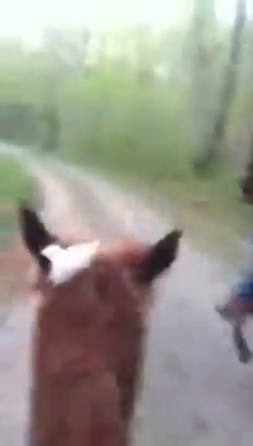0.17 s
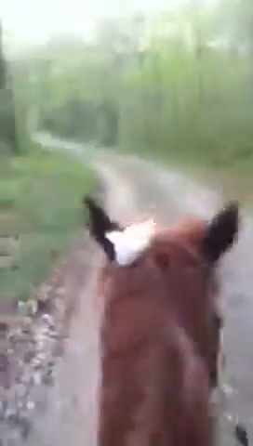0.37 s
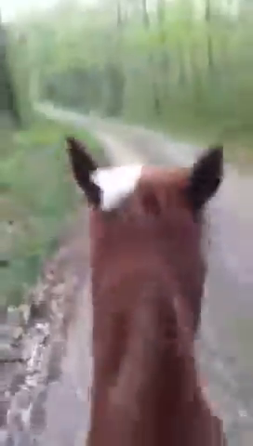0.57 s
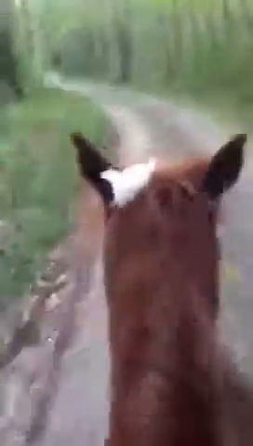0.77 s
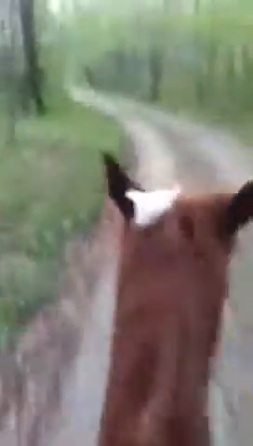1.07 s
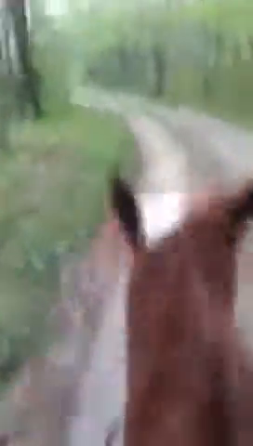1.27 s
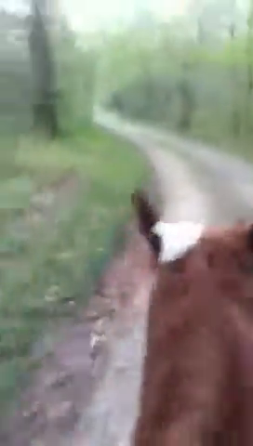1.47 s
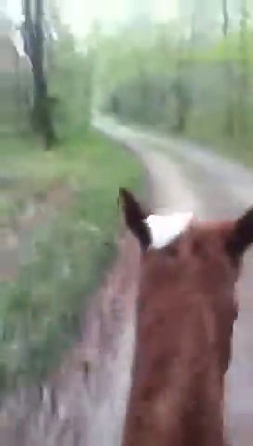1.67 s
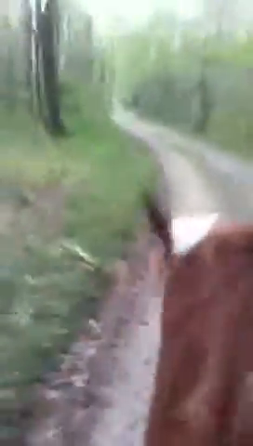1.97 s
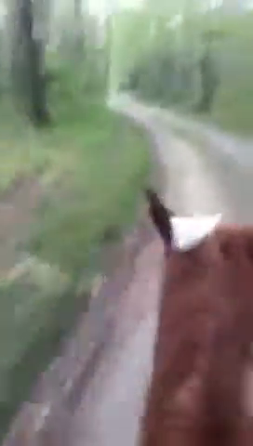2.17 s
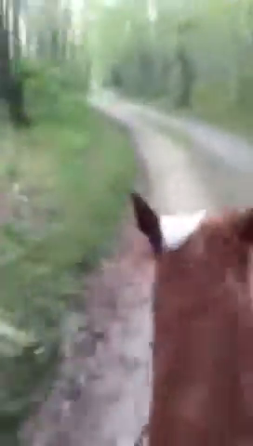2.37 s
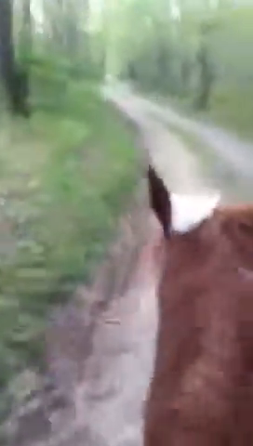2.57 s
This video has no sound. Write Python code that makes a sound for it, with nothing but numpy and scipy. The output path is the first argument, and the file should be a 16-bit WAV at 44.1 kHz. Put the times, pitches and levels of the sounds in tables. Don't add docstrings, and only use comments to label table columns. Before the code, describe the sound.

Horse hooves trot fast over loose gravel, grinding and snapping stones with hollow clops, while low wind thumps and pops on a close microphone carried in the saddle; faint bridle chinks and distant scuffing outdoors.

```python
import sys
import numpy as np
from scipy import signal
from scipy.io import wavfile
from scipy.ndimage import uniform_filter1d, minimum_filter1d

SR = 44100
rng = np.random.default_rng(int(sys.argv[2]) if len(sys.argv) > 2 else 0)


def transcribe(signal):
    frames = np.atleast_2d(signal).T
    limited = np.clip(frames, -1, 1)
    pcm = np.round(limited * 32767).astype(np.int16)
    wavfile.write(sys.argv[1], SR, pcm)


def elevation(decibels):
    levels = np.asarray(decibels, float)
    return 10 ** (levels / 20)


N = 119952


def evened(x):
    return x / np.sqrt(np.mean(x ** 2) + 1e-20)


def colour(x, points):
    freq_hz, level_db = np.transpose(points)
    bins_hz = np.abs(np.fft.fftfreq(8192, 1 / SR))
    db = np.interp(np.log(bins_hz + 1), np.log(freq_hz), np.maximum(level_db, -100))
    log_gain = db * np.log(10) / 20
    taps = np.fft.ifft(np.exp(np.conj(signal.hilbert(log_gain)))).real[:4096]
    return signal.fftconvolve(x, taps)[:N]


def add(mix, start_s, sound):
    part = mix[max(round(start_s * SR), 0):][:len(sound)]
    part += sound[:len(part)]


def resonate(x, hz, width_hz):
    turn = np.exp(2j * np.pi * np.cumsum(hz * np.ones(len(x))) / SR)
    pole = np.exp(-np.pi * width_hz / SR)
    return 2 * (turn * signal.lfilter([1 - pole], [1, -pole], x / turn)).real


def clicks(per_s, spread_db):
    size = elevation(spread_db * np.minimum(rng.exponential(1, N), 4)) * rng.choice([-1., 1.], N)
    return evened(size * (rng.random(N) < per_s / SR))


def swell(t, peak_s):
    return t / peak_s * np.exp(1 - t / peak_s)


# freq_hz, level_db
BED_COLOUR = [(24, -23), (40, -0.5), (114, -9), (973, -16.5), (1680, -29.5), (8310, -31), (15500, -38.5)]


def bed():
    bed_db, whine_hz, whine_db = -44.5, 14994, -70
    flutter = elevation(2.5 * evened(uniform_filter1d(rng.standard_normal(N), 700)))
    z = signal.stft(colour(rng.standard_normal(N), BED_COLOUR), nperseg=512)[2]
    patches = uniform_filter1d(rng.standard_normal(z.shape), 14, axis=0)
    patches = evened(uniform_filter1d(patches, 4, axis=1))
    hiss = evened(signal.istft(z * elevation(3 * patches), nperseg=512)[1][:N])
    whine = np.sin(2 * np.pi * whine_hz * np.arange(N) / SR)
    return elevation(bed_db) * flutter * hiss + elevation(whine_db) * whine


# centre_s, width_s, level_db
GUSTS = [(0.132, 0.028, -15.5), (0.168, 0.013, -17.5), (0.325, 0.034, -17.5), (0.386, 0.042, -17),
         (0.498, 0.046, -16), (0.54, 0.017, -20), (.573, 0.022, -21.5), (0.628, 0.018, -15.5),
         (0.655, 0.03, -20), (.715, 0.04, -22), (.756, 0.01, -17.5), (.782, 0.037, -16.5),
         (0.903, 0.032, -17), (0.938, 0.0086, -18), (0.976, 0.083, -22), (1.026, 0.032, -21.5),
         (1.167, 0.031, -18.5), (1.246, 0.014, -13), (1.289, 0.03, -25.5), (1.317, 0.029, -9.5),
         (1.393, 0.011, -20), (1.421, 0.017, -14), (1.587, 0.031, -21), (1.625, 0.035, -18),
              (1.662, 0.008, -17), (1.759, 0.041, -27.5), (1.8, 0.016, -18.5), (1.839, 0.022, -11.5),
              (1.88, 0.019, -18), (1.905, 0.02, -12), (1.954, 0.011, -17.5), (2.003, 0.019, -23.5),
              (2.107, 0.029, -23), (2.163, 0.022, -20), (2.219, 0.015, -17), (2.265, 0.023, -21.5),
              (2.449, 0.035, -19.5), (2.489, 0.025, -19.5), (2.71, 0.023, -15.5)]
# start_s, level_db
EDDY_POPS = [(0.1673, -35), (0.316, -6.5), (0.5, -6), (.574, -19), (0.6562, -7), (0.9432, -4), (0.9651, 0),
             (1.3086, -17), (1.317, -9), (1.418, -11), (1.6633, -9.5), (1.8382, -3.5), (2.225, 1),
             (2.6105, -15.5), (2.707, -7.5)]
# freq_hz, level_db
WIND_COLOUR = [(20, -35.5), (75, -1.5), (125, 2), (330, -9), (900, -29.5), (2000, -74)]


def wind():
    lumps_per_s, spread_db, wind_db, pop_s = 900, 2.5, 0, 0.0007
    t, power = np.arange(N) / SR, np.zeros(N)
    for centre_s, width_s, level_db in GUSTS:
        power += elevation(2 * level_db) * np.exp(-np.abs(2.67 * (t - centre_s) / width_s) ** 1.695)
    lumps = evened(colour(clicks(lumps_per_s, spread_db), WIND_COLOUR))
    lumps /= np.sqrt(uniform_filter1d(lumps ** 2, 900) + 0.084)
    low = uniform_filter1d(uniform_filter1d(lumps, 70), 70)
    lumps = low + (lumps - low) * np.minimum(power / elevation(-43.0), 1) ** 0.1
    out = elevation(wind_db) * np.sqrt(power) * lumps

    u = np.arange(-300, 300) / SR / pop_s
    pop = np.exp(-np.abs(1.66 * u) ** 1.39)
    pop -= .5 * np.exp(-(u - 1.7) ** 2) + 0.031 * np.exp(-(u + 3.5) ** 2)
    for (start_s, level_db), sign in zip(EDDY_POPS, rng.choice([-1., 1.], len(EDDY_POPS))):
        add(out, start_s - 300 / SR, sign * elevation(level_db) * pop)
    return out


# start_s, level_db, pitch_hz
TACK_CHINKS = [(.545, -52, 10870), (.566, -47, 11250), (.568, -53, 12580), (.69, -51, 10870),
               (.93, -56, 10870), (1.19, -55, 10870), (1.572, -50, 13650), (1.6, -51, 13580),
               (1.605, -49, 10870), (1.61, -51, 12580), (2.51, -55, 10870), (2.64, -53, 10870)]


def tack():
    peak_s, width_hz = .009, 70
    out, t = np.zeros(N), np.arange(6000) / SR
    for start_s, level_db, pitch_hz in TACK_CHINKS:
        waver = evened(resonate(rng.standard_normal(6000), pitch_hz, width_hz))
        ring = np.sin(2 * np.pi * pitch_hz * t) + .5 * waver
        add(out, start_s, elevation(level_db) * swell(t, peak_s) * ring)
    return out


# start_s, level_db, pitch_hz
STONE_CRACKS = [(0.1195, -32, 3730), (0.231, -24, 4180), (0.2567, -13, 5130), (0.2745, -22.5, 6030),
                (0.3149, -22, 1340), (0.34, -14, 6400), (0.3555, -17, 8640), (0.4255, -17.5, 2330),
                (0.4399, -12, 2250), (0.479, -26, 2150), (0.4813, -24, 2920), (0.6041, -13, 2180),
                (0.611, -15, 4660), (0.614, -16, 4860), (0.6283, -12.5, 1390), (0.7315, -7.5, 7340),
                (0.7478, -16, 4450), (0.7588, -11.5, 3930), (0.7652, -25, 2540), (0.7822, -15, 1240),
                (0.7969, -21.5, 2310), (0.8237, -34, 2500), (0.8774, -11, 7660), (0.8942, -16, 1710),
                (0.967, -15.5, 8600), (1.1429, -19, 2980), (1.1735, -16, 2850), (1.1885, -24, 1420),
                (1.229, -25, 4730), (1.4186, -10, 1740), (1.443, -23, 2520), (1.4836, -11.5, 2520),
                (1.4866, -8, 3480), (1.55, -21, 5580), (1.637, -23, 1580), (1.6989, -6.5, 2380),
                (1.7144, -25, 2930), (1.8113, -21.5, 4200), (1.8381, -23, 1090), (1.8915, -10, 1380),
                (1.9432, -17.5, 3380), (1.9589, -14.5, 2290), (2.1502, -17.5, 1360), (2.193, -22.5, 7660),
                (2.2055, -10.5, 2780), (2.2071, -10.5, 3500), (2.2171, -14, 2840), (2.2476, -25, 4030),
                (2.328, -15, 6110), (2.3713, -22, 9190), (2.4347, -16.5, 3420), (2.4523, -10, 4770),
                (2.463, -20, 1710), (2.5447, -12, 4330), (2.6068, -13, 2300), (2.7012, -24, 1230)]


def cracks():
    ring_cycles, roughness = 1.18, 0.58
    out, t = np.zeros(N), np.arange(400) / SR
    for start_s, level_db, pitch_hz in STONE_CRACKS:
        ring = np.exp(-t * pitch_hz / ring_cycles) * np.sin(2 * np.pi * pitch_hz * t)
        splinters = rng.standard_normal(60) * np.exp(-np.arange(60) / 25)
        rough = np.convolve(ring, splinters)[:400] * np.sqrt(pitch_hz / SR)
        add(out, start_s, -elevation(level_db) * (ring + roughness * rough))
    return out


# start_s, level_db
STONE_SNAPS = [(0.1175, -22.5), (0.2296, -17), (0.2567, -20.5), (0.594, -41), (0.4650, -23), (0.7304, -22),
               (0.8242, -29), (0.858, -28), (0.964, -35), (1.1697, -14.5), (1.4095, -18.5), (1.5030, -29),
               (1.5491, -18.5), (1.9443, -25), (2.2155, -18.5), (2.2475, -17), (2.327, -25),
               (2.5427, -21.5), (2.607, -26), (0.809, -34), (0.8367, -28), (0.848, -29), (0.932, -28.5),
               (2.41, -25.5), (2.537, -33), (2.058, -33), (1.034, -24)]
# pitch_hz, level_db, t60_s
HOOF_KNOCK = [
    (1035, 4.5, 0.0079),
    (2470, -5.5, 0.013),
    (377, 6, 0.0088),
]
# freq_hz, level_db
STONE_COLOUR = [(300, 6), (1500, -4.5), (2600, -2), (5500, -8), (9000, -10), (15000, -17)]


def snaps():
    snap_t60_s = 0.011
    burst, hit, t = np.zeros(N), np.zeros(N), np.arange(700) / SR
    for start_s, level_db in STONE_SNAPS:
        noise = elevation(level_db - 60 * t / snap_t60_s) * rng.standard_normal(700)
        add(burst, start_s, elevation(5.5) * noise)
        add(hit, start_s, elevation(-19) * noise)
    knock = np.zeros(700)
    for pitch_hz, level_db, t60_s in HOOF_KNOCK:
        knock += elevation(level_db - 60 * t / t60_s) * np.sin(2 * np.pi * pitch_hz * t)
    highpass = signal.butter(2, 300, 'high', fs=SR, output='sos')
    knocks = signal.sosfilt(highpass, signal.oaconvolve(hit, knock)[:N])
    return colour(uniform_filter1d(burst, size=3), STONE_COLOUR) + knocks


# start_s, level_db, pitch_hz
SHOE_CLOPS = [
    (0.783, -18, 1140),
    (0.89, -9, 903),
    (1.8873, -6, 1180),
    (2.149, -12, 1116),
    (2.45, -12.5, 1070),
    (1.572, -25.5, 1950),
    (1.7, -28, 2040),
    (1.169, -24.5, 4900),
    (2.332, -19.5, 1117),
    (0.437, -22, 1200),
]


def clops():
    peak_s = .0021
    out, t = np.zeros(N), np.arange(1000) / SR
    for start_s, level_db, pitch_hz in SHOE_CLOPS:
        add(out, start_s, elevation(level_db) * swell(t, peak_s) * np.sin(2 * np.pi * pitch_hz * t))
    return out


def ground_stones(grind):
    stones, t = np.zeros(N), np.arange(300) / SR
    size = rng.integers(0, 24, N)
    clumps = elevation(4.5 * evened(uniform_filter1d(rng.standard_normal((8, N)), 300)))
    for k, hz in enumerate(np.linspace(28, 112, 24) ** 2):
        ring = np.sin(2 * np.pi * hz * t) * np.exp(-t * hz / 2.3) * np.sqrt(hz)
        stones += signal.oaconvolve(grind * clumps[k // 3] * (size == k), ring)[:N]
    stones = evened(colour(stones, STONE_COLOUR))
    return stones / np.sqrt(uniform_filter1d(stones ** 2, 700) + .5)


# start_s, crunch_db, clop_db (re crunch), length_s
HOOF_FALLS = [(0.167, -23.5, -4.5, 0.018), (0.194, -27.5, -9, 0.045), (0.233, -25, -2, 0.019),
              (0.3348, -16, -3.5, 0.025), (0.4237, -17, -0.5, 0.024), (0.4621, -10.5, -5.5, 0.038),
              (0.6016, -8, -13, 0.025), (0.684, -28.5, -7, 0.041), (0.743, -20.5, -4, 0.051),
              (0.772, -25, 6.5, 0.034), (0.8714, -16, -26, 0.037), (0.8912, -20.5, 9, 0.014),
              (0.911, -26, 1, 0.035), (1.021, -19.5, -4, 0.039), (1.124, -21.5, -1, 0.072),
              (1.1598, -10.5, -14, 0.026), (1.185, -28, 13, 0.029), (1.226, -25.5, -12, 0.022),
              (1.273, -17.5, -12.5, 0.014), (1.3387, -21.5, 3, 0.017), (1.413, -21.5, -2, 0.024),
              (1.433, -17.5, -1.5, 0.021), (1.4783, -16, -2, 0.027),
              (1.543, -20.5, -14, 0.03), (1.564, -30, 4, 0.057), (1.591, -23.5, 0.5, 0.015),
                   (1.6157, -21, 2.5, 0.034), (1.6873, -16.5, -5.5, 0.038), (1.7223, -28.5, 13.5, 0.03),
                   (1.7502, -20, 2, 0.022), (1.7994, -19, -3.5, 0.021), (1.8779, -12.5, -1, 0.028),
                   (1.9505, -16.5, -7, 0.032), (1.9985, -23.5, 0.5, 0.039), (2.0775, -16, -4, 0.014),
                   (2.1383, -18, 2, 0.04), (2.1933, -12.5, -9, 0.038), (2.244, -23.5, 7, 0.067),
                   (2.3271, -14.5, -1, 0.021), (2.382, -32.5, 4.5, 0.046), (2.4237, -16.5, -6.5, 0.044),
                   (2.4529, -17.5, -1, 0.025), (2.5333, -19, -1, 0.044), (2.601, -25.5, 10, 0.017),
                   (2.6455, -26.5, 0, 0.036), (2.691, -19, 6, 0.039)]


def hooves():
    grains_per_s, spread_db, loose_db = 8000, 3.5, -47.5
    crunch_gain_db, clop_gain_db, clop_hz, clop_width_hz = -10, -2.5, 1020, 250
    rise, fall_db, tail_db, tail_s = 0.2, -9.5, -17, 0.054
    grind, out = clicks(grains_per_s, spread_db), np.zeros(N)
    stones = ground_stones(grind)
    for start_s, crunch_db, clop_db, length_s in HOOF_FALLS:
        hz = clop_hz * rng.uniform(0.83, 1.07)
        u = np.arange(0, length_s + 3 * tail_s, 1 / SR) / length_s
        press = np.minimum(u / rise, 1) * elevation(fall_db * u) * np.clip(4 * (1 - u), 0, 1)
        tail = np.minimum(u, 1) * elevation(tail_db - 20 * u * length_s / tail_s)
        i = round(start_s * SR)
        n = len(grind[i:i + len(u)])
        clop = resonate(grind[i:i + n] * press[:n], hz, clop_width_hz)
        clop = resonate(clop, hz, 3 * clop_width_hz)
        clop /= np.abs(clop).max()
        crunch = (press + tail)[:n] * stones[i:i + n]
        step = elevation(crunch_gain_db) * crunch + elevation(clop_db + clop_gain_db) * clop
        add(out, start_s, elevation(crunch_db) * step)
    return out + elevation(loose_db) * stones


def scene():
    return (bed() + wind() + tack() + cracks() + snaps() + clops() + hooves())[None]


def masked(x):
    mask_db, spread_db = -44.5, 3
    z = signal.stft(x, nperseg=256)[2]
    band_power = (abs(z[1:]) ** 2).reshape(32, 4, -1).mean(1)
    band_db = 10 * np.log10(np.repeat(band_power, 4, axis=0) + 1e-20)
    treble_db = 10 * np.log10((abs(z[8:]) ** 2).sum(0) + 1e-20)
    near_db = -minimum_filter1d(-treble_db, size=10, origin=-2)
    blocks = z.shape[1] // 4 + 1
    odd = rng.standard_normal((blocks, 8)) + rng.standard_normal((blocks, 1))
    odd = np.repeat(np.repeat(odd, 4, axis=0), 16, axis=1).T[:, :z.shape[1]]
    keep = band_db > near_db + mask_db + spread_db * odd
    keep |= np.arange(128)[:, None] < 14
    return signal.istft(z * np.vstack([keep[:1], keep]), nperseg=256)[1][:N]


def roll_off(x):
    return signal.sosfilt(signal.butter(12, 16500, fs=SR, output="sos"), x)


def record(dry):
    start_s, edge_hz = .1185, 15700
    limited = 0.93 * np.tanh(dry[0] / 0.82)
    edge = signal.firwin(127, edge_hz, fs=SR)
    held = masked(signal.oaconvolve(limited, edge, "same"))
    mix = held[None] * (np.arange(N) >= start_s * SR)
    return roll_off(mix)


dry = scene()
out = record(dry)
transcribe(out)
```